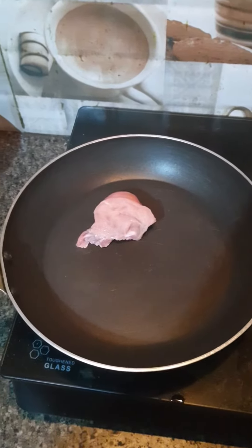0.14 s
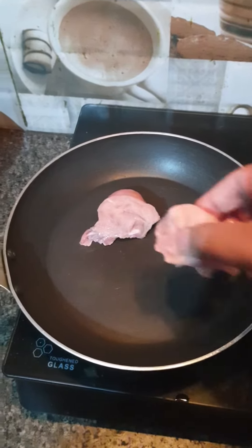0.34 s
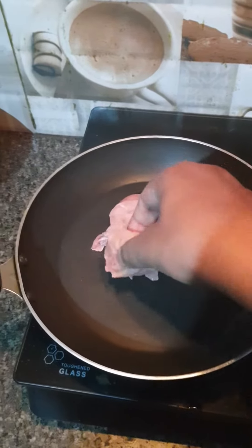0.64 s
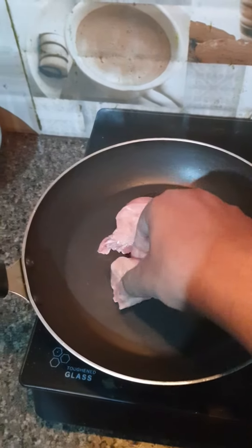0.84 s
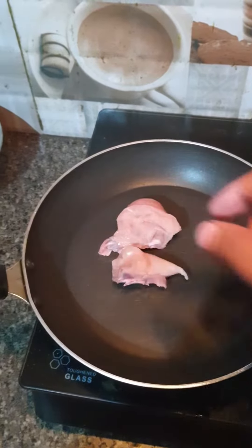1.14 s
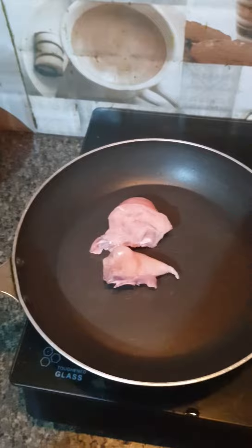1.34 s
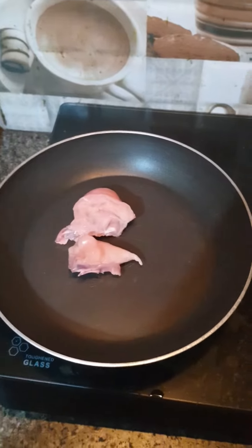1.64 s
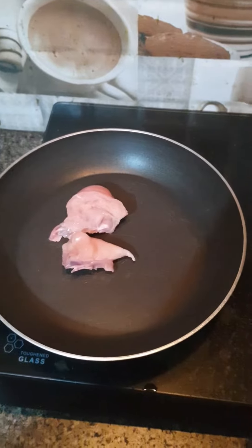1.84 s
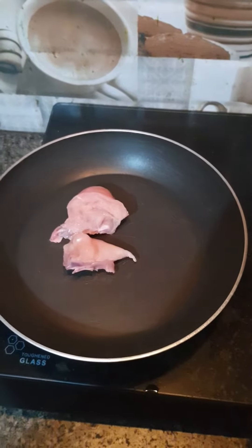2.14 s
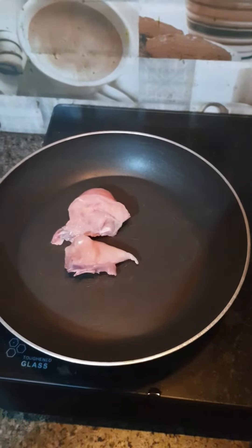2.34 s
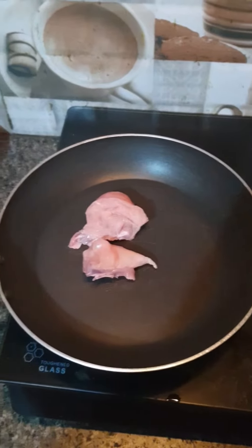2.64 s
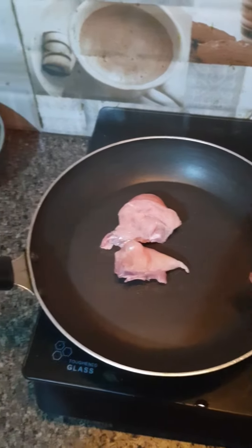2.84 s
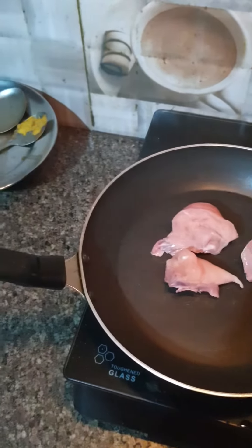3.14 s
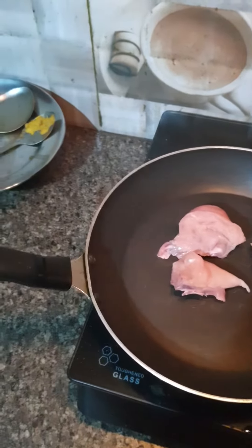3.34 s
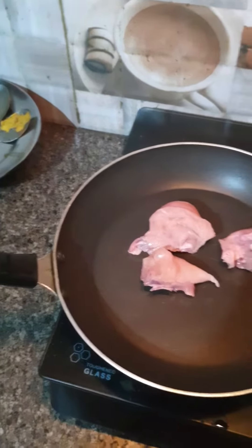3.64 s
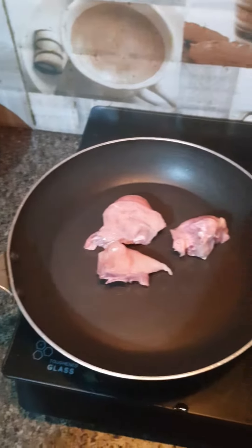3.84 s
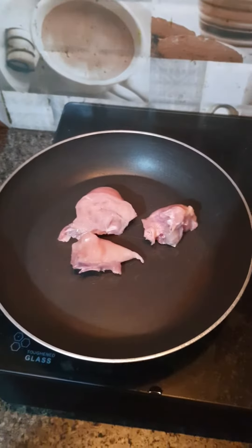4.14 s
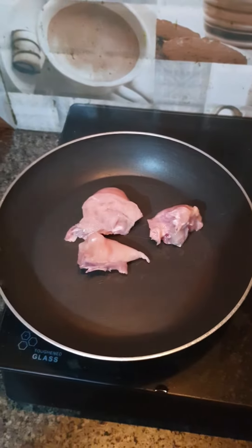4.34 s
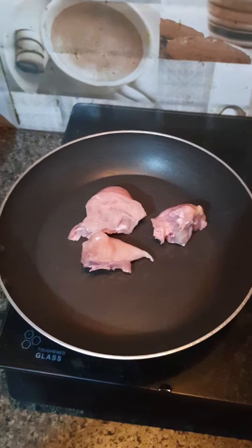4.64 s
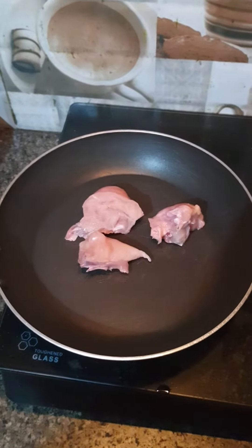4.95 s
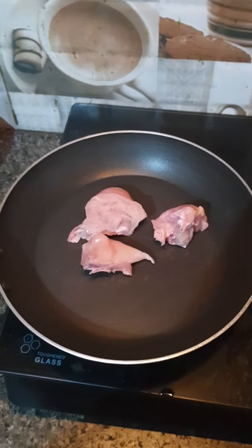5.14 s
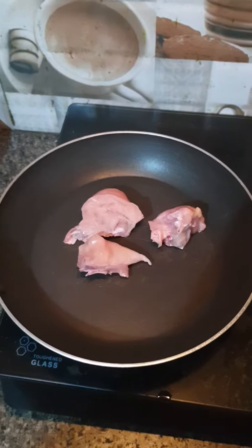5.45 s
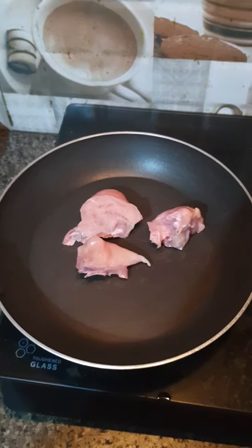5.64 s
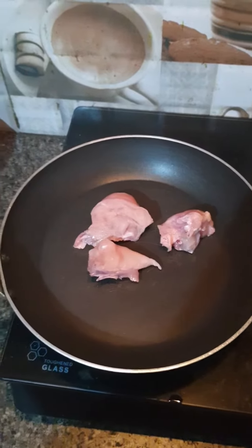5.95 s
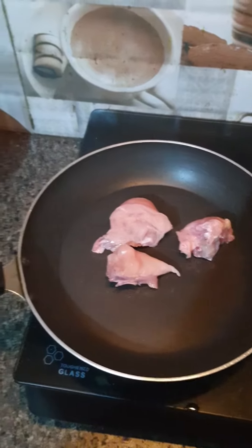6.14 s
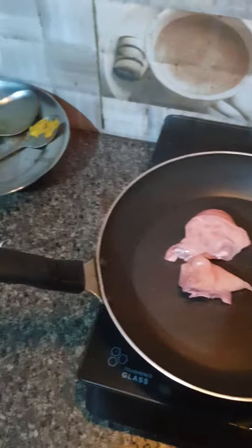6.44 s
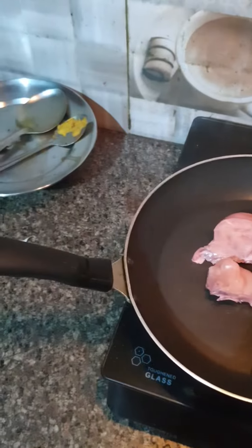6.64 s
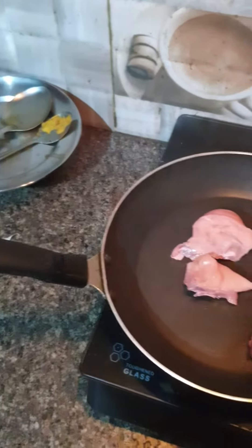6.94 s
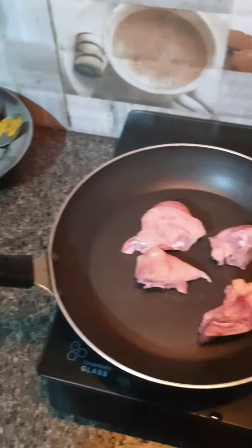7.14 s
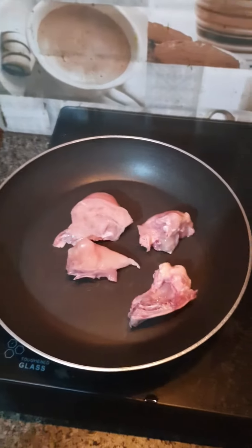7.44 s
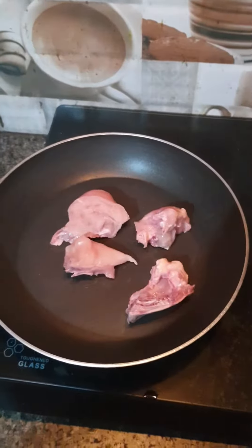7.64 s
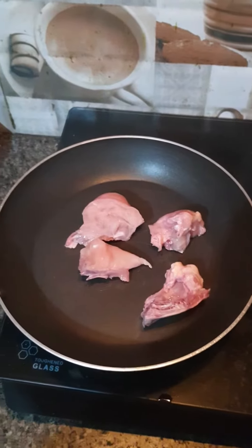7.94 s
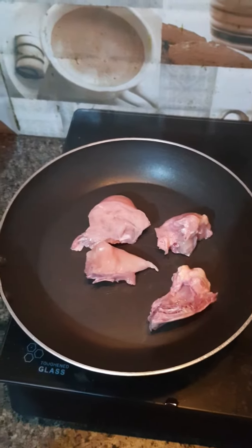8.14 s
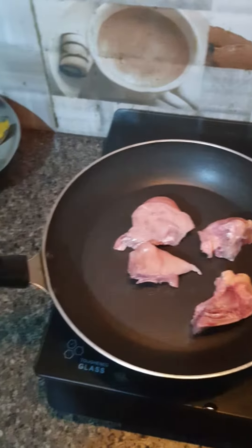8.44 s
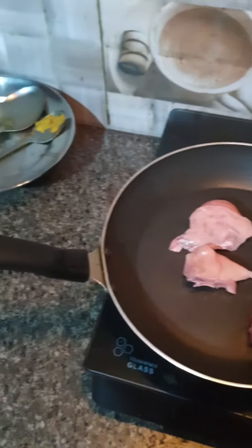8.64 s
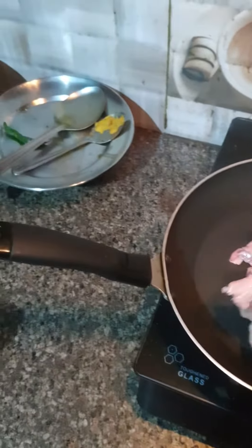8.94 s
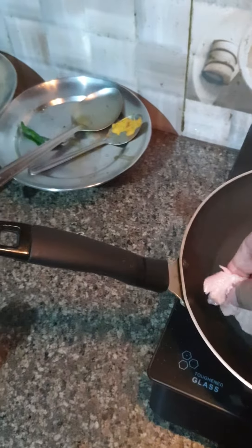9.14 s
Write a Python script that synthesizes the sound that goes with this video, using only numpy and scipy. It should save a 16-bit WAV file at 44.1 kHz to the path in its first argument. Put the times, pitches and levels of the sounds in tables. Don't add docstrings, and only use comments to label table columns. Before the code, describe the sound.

A low electric hum and airy fan run constantly while meat sizzles in bursts, fat cracks sharply, and a few soft kitchen knocks sound.

```python
import sys
import numpy as np
from scipy import signal
from scipy.fft import rfft, irfft, next_fast_len
from scipy.io import wavfile
from scipy.ndimage import uniform_filter1d

SR = 44100
rng = np.random.default_rng(int(sys.argv[2]) if len(sys.argv) > 2 else 0)


def transcribe(signal):
    frames = np.atleast_2d(signal).T
    limited = np.clip(frames, -1, 1)
    pcm = np.round(limited * 32767).astype(np.int16)
    wavfile.write(sys.argv[1], SR, pcm)


def field_ratio(decibels):
    return 10 ** (np.asarray(decibels, dtype=float) / 20)


N = 409688
TIME = np.arange(N) / SR
SIZE = next_fast_len(N)
FREQ = np.fft.rfftfreq(SIZE, 1 / SR)
SIDES = np.array([[.5], [-.5]])
TOP_HZ = 15780
PORT_LAG_S = .0001
CONTACT_S = .13


def sizzle():
    # hz, left_db_per_hz, right_db_per_hz
    fry = [(1100, -76.5, -74.5), (1500, -86.5, -85), (2270, -87.5, -86), (2960, -88.5, -88.5),
           (3540, -89, -80.5), (5000, -73.5, -77), (5440, -81.5, -73.5), (7500, -76, -66),
           (8580, -75.5, -73), (10000, -79.5, -85), (10920, -73.5, -76.5), (11980, -74, -68),
           (13940, -72.5, -73), (15400, -69.5, -72.5)]
    # hz, width_hz, lift_db
    pan_modes = [(1851, 29, 13.5), (2260, 160, 4), (2800, 86, 4), (5415, 43, 7)]
    wet_db, fry_db, spray_db = frying_db()

    fine = field_ratio(0.65 * rng.exponential(size=N)) * (rng.random(N) < .15)
    pops = 0.6 * rng.exponential(size=N) * (rng.random(N) < 70 / SR)
    bursts = decay(fine, tau_s=0.0045)
    bursts = bursts / bursts.mean() + decay(pops, tau_s=0.00051)
    clusters = field_ratio(0.067 * walk(14) + 0.065 * walk(60) + 0.4 * walk(300))

    noise = rng.standard_normal((3, N))
    shared = np.array([noise[2], lag(noise[2])])
    push = (noise[:2] + .55 * shared) * np.sqrt(bursts) * clusters
    push = rfft(push / push.std(), SIZE) * nearby(t60=.08, db=-11)
    gain = response([(1000, -105, -105), (1530, -90.0, -96.5)] + fry[2:])
    hiss = push * gain * rings(pan_modes) * (FREQ < TOP_HZ)

    out = 0
    for low_hz, high_hz, db in [(1, 4800, wet_db), (4800, 9800, fry_db), (9800, SR, spray_db)]:
        band = irfft(hiss * share(low_hz, high_hz), SIZE)[:, :N]
        out = out + band * field_ratio(db - np.median(db) + 0.74 * walk(15))

    hollow_s, hollow_db = 6.88, -4
    hollow = irfft(hiss * share(4330, 5450), SIZE)[:, :N]
    out = out + hollow * field_ratio(hollow_db) * np.clip((TIME - hollow_s) / CONTACT_S, 0, 1)
    return out * field_ratio(turn_db() * SIDES)


def frying_db():
    # start_s, settled_db, flare_db, spray_db, wet_db
    pieces = [
        (-.5, -45.5, -71, 1, -6.5),
        (1.07, -38.5, -37, 0.5, -13.5),
        (3.36, -46.5, -39, 4.5, -5.5),
        (5.2, -48, -50, 6, -4),
        (6.88, -49.5, -40, 3, -14),
    ]
    # middle_s, length_s, level_db, spray_db, wet_db
    presses = [(0.197, 0.11, -58, 11, -5), (0.547, 0.17, -52, 0, -14), (0.922, 0.15, -39, 2.5, -16),
               (3.04, .08, -48, 0, 0), (3.18, 0.11, -40, 8, -10), (3.622, 0.2, -41, 7, -9),
               (3.896, 0.13, -40, -6, -11.5), (4.206, .07, -37.5, 0, -11), (5.4, 0.17, -45, -2, -3),
               (5.63, 0.044, -37, -8, -3), (6.5, .3, -47, -8, -12), (6.76, 0.053, -48, 0, 4),
               (6.962, 0.21, -38.5, 0, -7), (7.54, 0.059, -40, -4, -2.5)]
    flare_s = .55
    power = 0
    for s, settled_db, flare_db, spray_db, wet_db in pieces:
        age_s = np.maximum(TIME - s, 0)
        contact = 1 - np.exp(-(age_s / CONTACT_S) ** 2)
        flare = field_ratio(2 * flare_db) * np.exp(-(age_s / flare_s) ** 2)
        own = contact * (field_ratio(2 * settled_db) + flare)
        power = power + own * field_ratio(2 * np.array([[wet_db], [0], [spray_db]]))
    for s, length_s, db, spray_db, wet_db in presses:
        power = power + bell(s, length_s) * field_ratio(2 * (db + np.array([[wet_db], [0], [spray_db]])))
    return 10 * np.log10(power)


def spits():
    # start_s, left_peak_db, right_peak_db, brightness_hz
    drops = [(0.0462, -41, -25, 10100), (0.1642, -29, -22, 10800), (1.7671, -19, -24, 10800),
             (1.8193, -23, -18, 9600), (1.8713, -21, -24, 10000), (2.0605, -23, -20, 10200),
             (2.1635, -20, -16, 11400), (3.9972, -15, -12, 13500), (4.0848, -22, -15, 13500),
             (4.1525, -22, -17, 13200), (4.2049, -13, -14, 13100), (4.4289, -18, -9, 13500),
             (5.3784, -14, -12, 13500), (5.3951, -16, -14, 13500), (5.5235, -19, -20, 10500),
             (5.7462, -14, -7, 13500), (5.8, -18, -14, 13500), (5.9415, -18, -9, 13500),
             (6.5839, -34, -16, 7900)]
    out, t = np.zeros((2, N)), np.arange(SR // 50) / SR
    for s, left_db, right_db, hz in drops:
        spray = rng.standard_normal((2, len(t))) * .12 * np.exp(-t / .002)
        crack = bandpass((t == 0) + spray, .8 * hz, min(1.3 * hz, TOP_HZ))
        crack = np.array([crack[0], lag(crack[1])])
        crack = crack / np.abs(crack).max(axis=1, keepdims=True)
        i = int((s - 2 * PORT_LAG_S) * SR)
        out[:, i:i + len(t)] += crack * field_ratio(np.array([[left_db], [right_db]]))
    return out


def knocks():
    # start_s, pitch_hz, level_db, t60_s, left_minus_right_db
    struck = [(1.02, 680, -41, 0.26, -11), (3.115, 1860, -39, 0.19, 7), (3.115, 2760, -41, 0.15, 13),
              (3.115, 3800, -41, 0.23, 2), (3.115, 1240, -45, .1, 0), (5.625, 1100, -47, 0.2, -7),
              (5.76, 250, -30, 0.11, -3), (5.76, 1050, -43, 0.15, -3), (5.76, 654, -43, .12, -5),
              (5.76, 410, -33, 0.13, -3), (6.21, 504, -42.5, 0.97, -5), (7.52, 905, -44, 0.21, -9),
              (7.64, 3370, -48, .05, -7),
              (5.77, 90, -24, .45, 0),
        (5.76, 68, -29, .3, 0),
        (7.52, 3600, -39, .12, -4),
        (5.63, 2150, -46, .14, -2),
    ]
    # start_s, low_hz, high_hz, level_db, t60_s
    bumps = [
        (3.11, 1500, 4500, -43, .15),
        (4.2045, 3500, 15500, -23, .045),
        (5.62, 2000, 8500, -41, .08),
        (5.757, 60, 1100, -38, .3),
        (5.9412, 4000, 15500, -27, .03),
        (6.924, 4000, 9000, -42, .08),
        (7.52, 2500, 5500, -41, .1),
    ]
    out, t = np.zeros((2, N)), np.arange(SR // 2) / SR
    for s, hz, db, t60_s, pan_db in struck:
        rise = 1 - np.exp(-t / (0.0023 + 0.64 / hz))
        ring = np.sin(2 * np.pi * hz * t) * fall(t, t60_s) * rise
        i = int(s * SR)
        out[:, i:i + len(t)] += ring * field_ratio(db + pan_db * SIDES)
    for s, low_hz, high_hz, db, t60_s in bumps:
        noise = rng.standard_normal((3, len(t)))
        noise = bandpass(noise[:2] + noise[2], low_hz, high_hz)
        rise = 1 - np.exp(-t / 0.0017)
        i = int(s * SR)
        out[:, i:i + len(t)] += noise / noise.std() * field_ratio(db) * fall(t, t60_s) * rise
    return out


def hum():
    # ripple_count, shaft_count, level_db,
    # left_minus_right_db, right_leads_rad
    tones = [(0, 2, -59, 0, -0.1), (0, 3, -45.5, 2.5, -0.3), (1, -1, -71, -9, 0.2), (0, 4, -81, -2, 0.2),
             (1, 0, -30.5, -1, 0.26), (1, 1, -54.5, 3, 0.2), (0, 6, -73, -10, 0.2), (1, 2, -51.5, -2, -0.0),
             (2, -2, -70, -10, -0.1), (0, 8, -67.5, 3, -0.0), (1, 4, -61, 8, -0.1), (2, 0, -58.5, -4, -0.0),
             (0, 10, -61, 1, -0.0), (0, 11, -82, 0, 0.1), (3, -2, -63, -4, 0.1),
             (1, 9, -63.5, -10, 0.2), (1, 10, -50.5, -5.5, 0.095), (0, 15, -57, -2.5, 0.1),
             (1, 11, -50, -4, 0.078), (2, 7, -67, -3, 0.1), (1, 12, -60.5, 9, 0.5), (2, 8, -56, -10, -0.0),
             (3, 4, -55.5, 2, -0.1), (1, 14, -64, -4, -0.2), (4, 1, -65, -4, -0.3), (0, 20, -63, 1, -0.5),
             (4, 4, -67.5, -4, 0.15), (0, 23, -65, -8, 0.41), (4, 7, -63.5, 3, -0.3)]
    ripple_hz, shaft_hz = 99.98, 22.04
    step = 16
    ripple = 2 * np.pi * ripple_hz * TIME[::step]
    shaft = 2 * np.pi * np.cumsum(shaft_hz * (1 + 0.0013 * walk(1.462)))[::step] / SR
    out = 0
    for m, k, db, pan_db, lead_rad in tones:
        phase = round(m) * ripple + round(k) * shaft + (k != 0) * rng.uniform(0, 2 * np.pi)
        wobble_db = min(0.22 * (m + abs(k)), 2.5) * walk(6)[::step]
        level = np.sqrt(2) * field_ratio(db + wobble_db + pan_db * SIDES)
        out = out + level * np.sin(phase - lead_rad * SIDES)
    return signal.resample_poly(out, step, 1, axis=1)[:, :N]


def air():
    # hz, left_db_per_hz, right_db_per_hz
    rush = [(22, -93, -83), (40, -80, -91), (61.4, -75, -76), (86, -57.5, -60), (113, -60, -61),
            (150, -71, -66), (232, -74.5, -75), (284, -74, -76), (317, -69.5, -59.5), (400, -70.5, -71),
            (462, -82, -74.5), (525, -79, -73), (652, -81, -73.5), (1100, -83.5, -80),
            (1540, -86, -83.5), (2500, -91, -90), (6000, -86, -90), (15000, -100, -100)]
    # hz, width_hz, lift_db
    casing_modes = [(54.4, 4.7, 15.5), (264, 17, 4.5), (493, 6.9, 10), (719, 11, 7)]
    apart = 1 / (1 + (700 / (FREQ + 1)) ** 3.6)
    common = rfft(rng.standard_normal(SIZE))
    own = rfft(rng.standard_normal((2, SIZE)))
    mixed = np.sqrt(1 - apart) * common + np.sqrt(apart) * own
    gain = response(rush) * rings(casing_modes) * (FREQ < TOP_HZ)
    return irfft(mixed * gain, SIZE)[:, :N] * field_ratio(.5 * walk(3.9))


def turn_db():
    # middle_s, length_s, left_minus_right_db
    turns = [(1.0, 0.41, -4.5), (2.0, 0.41, 0), (3.2, 0.44, -1.5), (4.4, 0.48, -0.5), (5.75, .4, -1.5),
             (6.6, 0.64, -1.5), (9.15, 0.48, -1)]
    return sum(db * bell(s, length_s) for s, length_s, db in turns)


def nearby(t60, db):
    t = np.arange(SR // 5) / SR
    echo = rng.standard_normal((2, len(t))) * fall(t, t60)
    echo = field_ratio(db) * echo / np.sqrt(np.sum(echo ** 2, axis=1, keepdims=True)) + (t == 0)
    return rfft(echo, SIZE) / np.sqrt(1 + field_ratio(2 * db))


def rings(modes):
    lifts = [1 + (field_ratio(db) - 1) / (1 + (2 * (FREQ - hz) / width_hz) ** 2) for hz, width_hz, db in modes]
    return np.prod(lifts, axis=0)


def response(table):
    hz, *columns = np.transpose(table)
    gains = [field_ratio(np.interp(np.log(FREQ + 1), np.log(hz), db)) for db in columns]
    return np.array(gains) * np.sqrt(SR / 2)


def share(low_hz, high_hz):
    rise = lambda hz: 1 / (1 + (hz / (FREQ + 1)) ** 8)
    return rise(low_hz) - rise(high_hz)


def bandpass(x, low_hz, high_hz):
    return signal.sosfilt(signal.butter(2, [low_hz, high_hz], "band", fs=SR, output="sos"), x)


def decay(x, tau_s):
    return signal.lfilter([1], [1, -np.exp(-1 / (tau_s * SR))], x)


def fall(t, t60_s):
    return np.exp(-np.log(1000) * t / t60_s)


def lag(x):
    return np.roll(x, round(PORT_LAG_S * SR))


def bell(s, length_s):
    return np.exp(-(2 * (TIME - s) / length_s) ** 2)


def walk(rate_hz):
    levels = np.repeat(rng.standard_normal(int(N / SR * rate_hz) + 2), 4)
    levels = uniform_filter1d(levels, size=4)
    return 1.25 * np.interp(TIME * rate_hz * 4, np.arange(len(levels)), levels)


def scene():
    # time_s, hum_db
    hum_swell = [(0.0, -32), (0.55, -31), (0.85, -32.5), (1.1, -30.5), (1.45, -33), (1.7, -31.5), (2.55, -31),
                 (3.0, -32.5), (3.8, -31), (4.05, -33), (5.3, -31.5), (6.34, -32.5), (6.65, -34), (6.95, -32.5),
                 (7.6, -32), (7.89, -34), (8.1, -32.5), (9.29, -35)]
    swell_db = np.interp(TIME, *np.transpose(hum_swell))
    swell_db = swell_db - np.median(swell_db)
    fan = air() * field_ratio(0.33 * swell_db + 0.19 * turn_db() * SIDES)
    return sizzle() + spits() + knocks() + hum() * field_ratio(swell_db) + fan


def roll_off(x):
    return signal.sosfilt(signal.butter(12, 15900, fs=SR, output="sos"), x)


def record(dry):
    return roll_off(dry)


dry = scene()
out = record(dry)
transcribe(out)
```